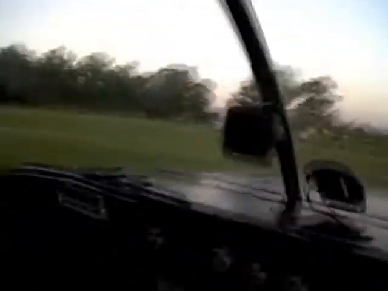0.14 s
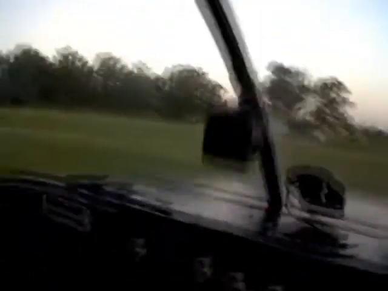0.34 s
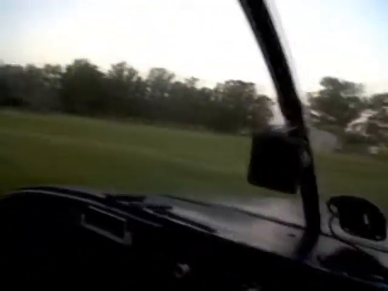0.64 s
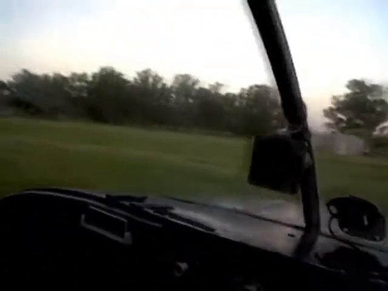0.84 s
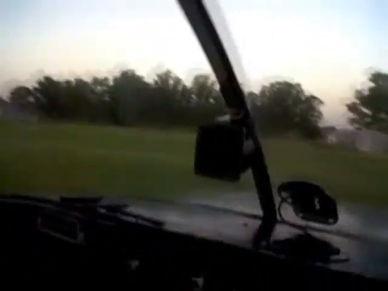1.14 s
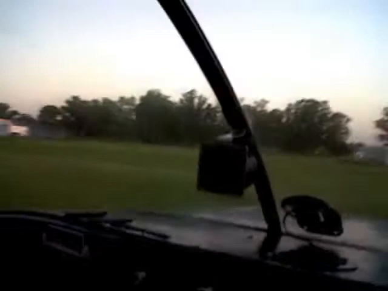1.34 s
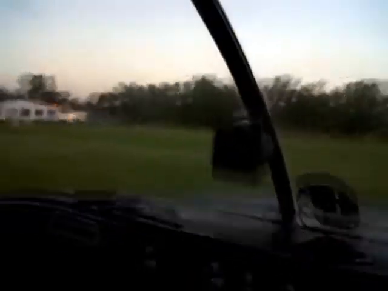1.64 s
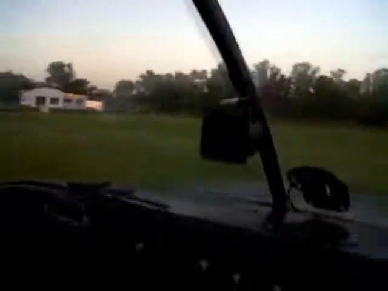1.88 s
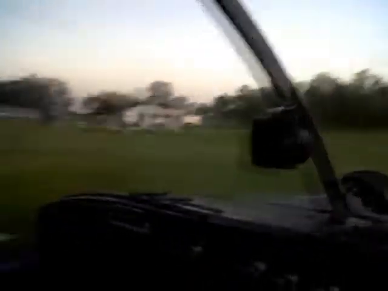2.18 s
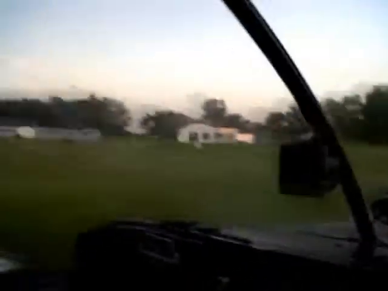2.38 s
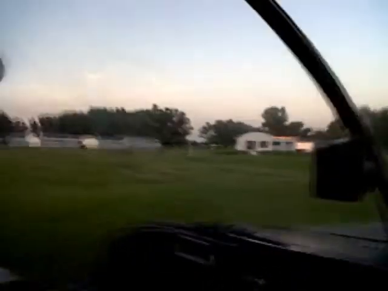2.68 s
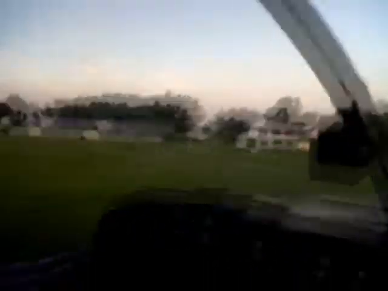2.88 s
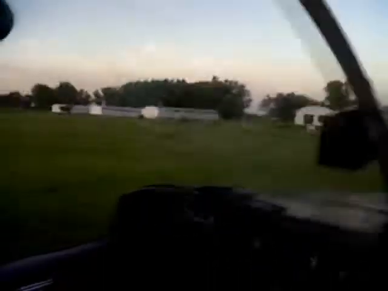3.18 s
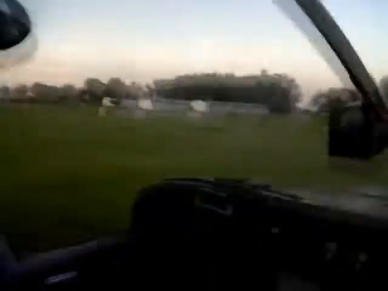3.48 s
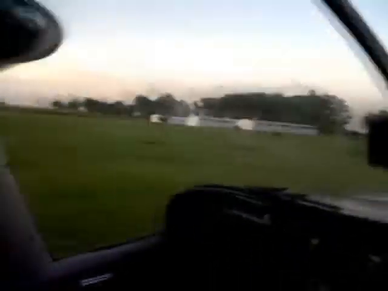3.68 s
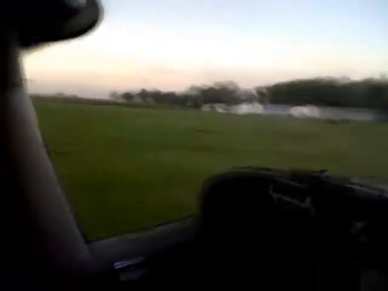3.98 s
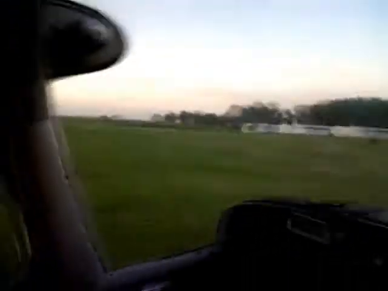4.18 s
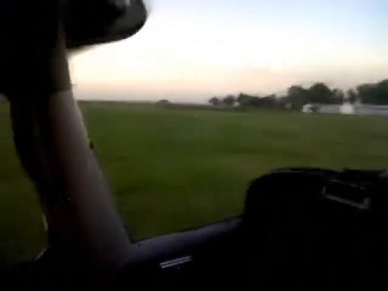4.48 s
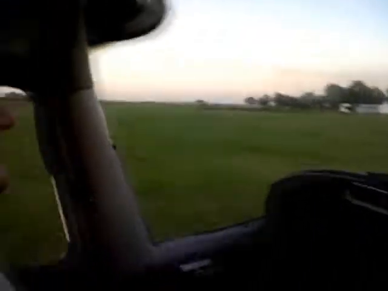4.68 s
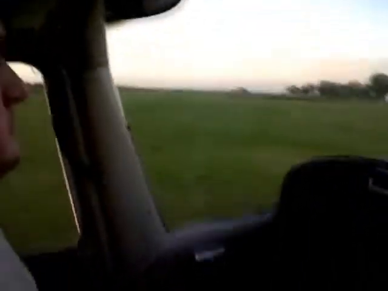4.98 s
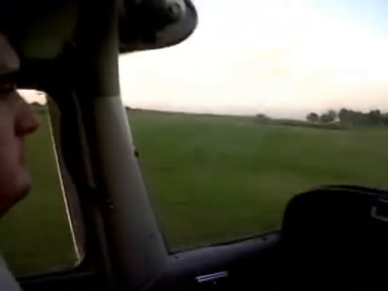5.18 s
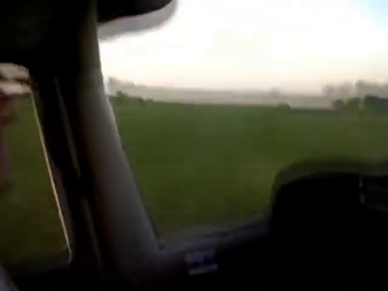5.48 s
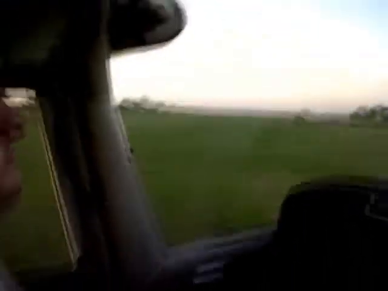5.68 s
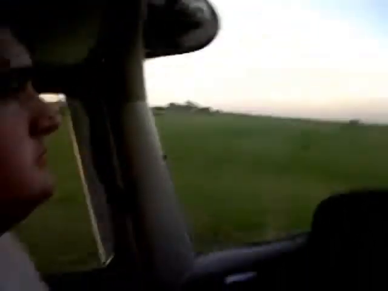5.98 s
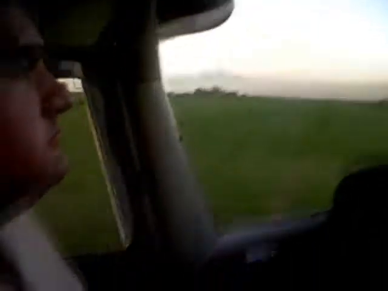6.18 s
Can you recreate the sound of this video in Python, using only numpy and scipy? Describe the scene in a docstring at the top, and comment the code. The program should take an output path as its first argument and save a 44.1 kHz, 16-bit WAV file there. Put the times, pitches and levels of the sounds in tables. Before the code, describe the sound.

Heard inside a small vehicle on uneven grass, through a narrow-band, boxy pocket microphone. A low engine drone pulses throughout, rising slightly in pitch during the first second, then easing by about 1.8 s and holding steady. Around it lie a rough body roar, buzzing panels and faint loose clatter. Light knocks and soft hollow floor clonks mark the first two seconds, with a small squeak and rattle near 1.6. At 2.2 a hard bump makes panels bang and everything swell, then sink. Another at 2.7 brings thumps, bright short squeaks to 2.85 and several hollow blows until 3.1. After a brief lull, a jolt at 3.65 leads into the roughest stretch, 3.9 to 4.9: crowded knocks, wheel thumps, clonks and rattling over louder roar. It calms around 5, jolts once more at 5.6 with a faint squeak at 5.9, then drones on to a small knock at 6.26 and abrupt end.

```python
"""An engine drones on its crank orders in a small vehicle rolling over rough grass, heard in the cabin through
a narrow-band pocket microphone. Noise bands make the body roar, random touches make panels buzz; contacts ring
panel modes as knocks, short tones make wheel thumps and floor clonks, noise puffs squeak. Loose parts clatter
and rattle as noise; at times the level of drone, buzz, roar and clatter rises together, holds, then sinks."""
import sys
import numpy as np
from scipy import signal
from scipy.fft import rfft, irfft
from scipy.io import wavfile
from scipy.ndimage import uniform_filter1d

SR = 44100
rng = np.random.default_rng(int(sys.argv[2]) if len(sys.argv) > 2 else 0)


def voltage_ratio(level):
    """Linear amplitude factor for a level in decibels (scalar or array-like)."""
    return 10 ** (np.asarray(level, float) / 20)


def persist_wave(psi):
    """Save psi, clipped to +-1, as 16-bit WAV."""
    counts = np.round(np.clip(psi, -1, 1) * 32767).astype(np.int16)
    wavfile.write(sys.argv[1], SR, np.atleast_2d(counts).T)


N = 279153

# crank speed: (time [s], speed [turns/s])
CRANK_SPEED = [(0.0, 25.5), (0.12, 26.8), (0.65, 28.0), (0.93, 28.1), (1.76, 25.7), (2.19, 25.8),
               (2.27, 25.1), (4.11, 24.8), (6.33, 25.0)]
# drone between bumps: (time [s], level [dB])
DRONE_LEVEL = [(0, -41.5), (.45, -36.5), (1.0, -39.5), (1.9, -40.5), (2.1, -39), (3.3, -39), (6.33, -36.5)]
# drone lines: (multiple of crank speed [1], relative level [dB])
CRANK_ORDERS = [(2, -13.5), (3.5, -16), (4, 2), (4.5, -10.5), (5, -14), (6, -2), (6.5, -10), (7, -8.5),
                (7.5, -11.5), (8, -3.5), (8.5, -9), (9, -7), (10, -12)]
# extra third crank order, raised 2 dB in use: (time [s], level re drone [dB])
THIRD_ORDER_LEVEL = [(0, -6.5), (.5, -0.5), (1.0, -4.5), (1.5, -5.5), (2.2, -23.5), (6.33, -15)]
# swells of the shared level: (time [s], rise [dB], hold from that time [s])
SWELLS = [(1.498, 1.5, 0.27), (1.626, 3.5, 0.035), (1.953, 3.5, .06), (2.216, 12, 0.09), (2.695, 9.5, 0.23),
          (3.217, 0.5, 0.2), (3.654, 9, 0.083), (3.797, 5, 0.19), (3.909, 10.5, 0.3), (4.305, 9, 0.14),
          (4.422, 11.5, 0.36), (5.081, 1, 0.28), (5.582, 10, 0.25)]
# brief level dips: (time of the lowest point [s], depth [dB])
DIPS = [(1.399, 4.5), (1.90, 4), (2.60, 2), (3.568, 5), (4.36, 1.5), (5.04, 2.5), (5.49, 3), (6.13, 2.5)]
# body roar spectrum: (frequency [Hz], relative density [dB per Hz])
ROAR_SPECTRUM = [(30, -16), (60, -9), (100, -3), (216, -5.5), (330, -5.5), (535, -6.5), (800, -3),
                 (1210, -3.5), (1580, -7.5), (2000, -23.5), (2600, -29.5), (4000, -45.5)]
# panel modes: (frequency [Hz], relative level in the buzz [dB], t60 [s])
PANEL_MODES = [(543, -4.5, 0.054), (686, -13, 0.34), (805, 0.5, 0.11), (877, -1, 0.12),
               (1058, -19.5, 0.063), (1188, -3.5, 0.082), (1240, -0.5, .06), (1356, 1, 0.045),
               (1460, -1, 0.068), (1572, -1, 0.04), (1770, -8.5, 0.065)]
# buzz modes above 1100 Hz: (time [s], added level [dB])
UPPER_MODES_LEVEL = [(0, 1.5), (.8, 3), (1.3, -2), (2.0, 0.5), (2.7, 2), (3.5, 0), (4.0, 2.5), (4.8, 2),
                     (5.2, 2.5), (5.8, 2), (6.33, -1.5)]
# steady clatter between bumps: (time [s], level [dB])
CLATTER_LEVEL = [(0, -65), (1, -65.5), (2, -63.5), (2.6, -64.5), (3.5, -65), (4.0, -63), (5, -62.5),
                 (5.7, -63), (6.33, -63)]
# panel knocks: (time [s], peak before dulling [dB], frequency of the most excited modes [Hz])
KNOCKS = [(0.117, -23.5, 1230), (0.249, -23.5, 1264), (0.435, -26.5, 1263), (1.498, -20, 1230),
          (1.546, -22.5, 805), (1.669, -19.5, 796), (1.749, -22, 1475), (1.826, -21.5, 1467),
          (1.843, -22, 805), (1.964, -23, 1470), (1.989, -20, 1240), (2.223, -7.5, 1194),
          (2.299, -11, 1280), (2.35, -11.5, 1197), (2.381, -15, 850), (2.455, -19, 830),
          (2.705, -8.5, 1227), (2.762, -16, 1240), (2.802, -20.5, 801), (2.857, -12.5, 1208),
          (3.407, -21.5, 1230), (3.5, -23, 802), (3.663, -16, 805), (3.715, -19.5, 1530),
          (3.896, -9.5, 1365), (3.97, -11.5, 1240), (4.025, -19.5, 940), (4.049, -11.5, 1230),
          (4.108, -15, 896), (4.155, -12.5, 1360), (4.217, -11.5, 1210), (4.265, -7.5, 1306),
          (4.286, -6.5, 1237), (4.426, -10, 1240), (4.479, -10, 1500), (4.618, -10.5, 1350),
          (4.639, -16.5, 1240), (4.696, -18, 812.7), (4.757, -9.5, 1380), (4.859, -18, 870),
          (4.945, -16, 1400), (5.092, -27, 1240), (5.59, -12, 1460), (5.662, -18.5, 807),
          (5.714, -17, 1372), (5.755, -15, 1380), (5.808, -21, 876), (5.928, -27.5, 800),
          (6.038, -28, 1190), (6.262, -23, 1460)]
# wheel thumps, 6.5 dB lower in use: (time [s], level [dB], frequency [Hz])
THUMPS = [(0.221, -28.5, 164), (1.118, -31.5, 204), (1.642, -24, 200), (2.661, -29, 209),
          (2.713, -16.5, 119), (3.895, -17.5, 183.3), (4.02, -16, 194), (4.185, -20.5, 204),
          (4.249, -19, 177.6), (4.412, -26, 174), (4.574, -22, 188), (5.655, -30, 183), (5.705, -30, 197),
          (6.019, -21, 200)]
# squeaks: (time [s], peak [dB], frequency [Hz])
SQUEAKS = [(0.2505, -37.5, 2490), (0.467, -42, 2550), (1.5866, -26.5, 2570), (2.24, -30, 2640),
           (2.7177, -27.5, 2570), (2.733, -33, 2480), (2.7823, -18.5, 2544), (2.8356, -16.5, 2560),
           (3.12, -43.5, 2570), (3.195, -42, 2535), (3.283, -47, 2530), (5.8672, -36.5, 2700)]
# hollow floor blows, 4 dB lower in use: (time [s], level [dB], frequency [Hz])
CLONKS = [(0.725, -28, 494), (0.876, -25, 505), (0.983, -27.5, 525), (1.082, -24, 514), (1.348, -22.5, 512),
          (1.425, -26.5, 542), (1.807, -29, 526), (1.842, -25.5, 530), (2.22, -20.5, 578),
          (2.506, -22.5, 626), (2.703, -22.5, 590), (2.745, -18.5, 430), (2.817, -18, 697),
          (2.862, -10.5, 531), (2.908, -13, 516), (2.945, -18, 600), (3.026, -15, 690), (3.069, -21, 520),
          (3.147, -22.5, 468), (3.666, -13, 550), (3.705, -17.5, 357), (3.743, -12, 547), (3.903, -9, 751),
          (3.949, -16.5, 566), (3.988, -12.5, 574), (4.11, -10.5, 554), (4.151, -21.5, 705),
          (4.192, -14, 520), (4.272, -10.5, 518), (4.435, -13, 548), (4.496, -17.5, 541),
          (4.695, -13.5, 686), (4.786, -19.5, 514), (4.856, -19.5, 550), (5.148, -22, 713),
          (5.658, -16.5, 475), (5.817, -21.5, 475), (6.259, -23, 480)]
# rattle bursts: (time [s], level re steady clatter [dB])
RATTLES = [(.78, 7), (1.091, 6.5), (1.33, 11.5), (1.584, 10.5), (1.841, 8.5), (2.23, 10.5), (2.354, 2.5),
           (2.719, 11), (2.79, 4.5), (2.851, 3), (3.195, 11.5), (3.939, 3), (4.07, 6.5), (4.12, 2.5),
           (4.432, 8), (4.48, 5), (4.635, 7), (4.769, 6.5), (5.3, 6), (5.59, 9), (5.864, 7), (6.218, 7.5)]
# mirror images of the low-rate sampling: (frequency [Hz], gain [dB])
MIRROR_GAIN = [(3900, 0), (4700, -13.5), (5450, -26.5), (6500, -45.5), (7200, -61.5), (7600, -93.5),
               (8600, -80), (9200, -65), (10000, -88.5)]

RISE_S, DRONE_RISE_S, SINK_DB_PER_S, DIP_S = 0.005, 0.015, 45, 0.037
DRONE_SHARE, CLATTER_SHARE = 0.98, 0.97   # of each swell and dip, in dB
BUZZ_DB = -36                             # between bumps
STIR_DB, STIR_S = -19, 0.014              # panel stir re knock peak; time to its maximum
RATTLE_S, KNOCK_S, SQUEAK_S = 0.018, 0.049, 0.013
SAMPLING_HZ = 8000


def rms_one(x):
    """Scales to rms 1."""
    return x / np.sqrt(np.mean(x ** 2) + 1e-20)


def in_time(rows):
    """Interpolates table columns to one value a sample."""
    s, *columns = np.transpose(rows)
    return [np.interp(np.arange(N) / SR, s, c) for c in columns]


def drift(rate_hz):
    """Slow noise of rms 1: two equal poles at rate_hz, run on every 40th sample."""
    r = np.exp(-80 * np.pi * rate_hz / SR)
    white = rng.standard_normal(N // 40 + 2002)
    slow = signal.lfilter([1], [1, -2 * r, r * r], white)[2000:]
    return np.interp(np.arange(N) / 40, np.arange(len(slow)), rms_one(slow))


def ring(clicks, hz, t60_s):
    """Two-pole resonance: a unit click starts a decaying sine of height 1."""
    r, w = voltage_ratio(-60 / (t60_s * SR)), 2 * np.pi * hz / SR
    return signal.lfilter([0, np.sin(w)], [1, -2 * r * np.cos(w), r * r], clicks + 1e-18)


def cut(x, hz, kind, order=2):
    """Butterworth filter."""
    return signal.sosfilt(signal.butter(order, hz, kind, fs=SR, output="sos"), x)


def dying(times_s, gains, tau_s):
    """Envelope that rises fast from each time, peaks at its gain after tau_s and dies away."""
    jumps, r = np.zeros(N), np.exp(-1 / (tau_s * SR))
    jumps[(np.array(times_s) * SR).astype(int)] = gains
    return signal.lfilter([np.e / (tau_s * SR)], [1, -2 * r, r * r], jumps + 1e-18)


def bursts(rows, cycles, rough, lose_db):
    """Short swelling and dying tones with an uneven envelope, their length set in cycles."""
    out = np.zeros(N)
    for s, level_db, hz in rows:
        length_s = cycles / hz
        t = np.arange(int(4 * length_s * SR)) / SR
        lumps = uniform_filter1d(rng.standard_normal(4000), 60)[:len(t)]
        shape = t / (0.36 * length_s) * np.exp(1 - t / (0.43 * length_s))
        shape = shape * (1 + rough * 8 * lumps)
        tone = voltage_ratio(level_db - lose_db) * shape * np.sin(2 * np.pi * hz * t)
        at = int(s * SR)
        out[at:at + len(t)] += tone[:N - at]
    return out


def swell(rise_s):
    """Level change in dB: the highest swell at each moment, less the dips."""
    t = np.arange(N) / SR
    rises = []
    for s, db, hold_s in SWELLS:
        sinking_db = np.maximum(db - SINK_DB_PER_S * np.maximum(t - s - hold_s, 0), 0)
        rises.append(np.clip((t - s) / rise_s, 0, 1) * sinking_db)
    dips_db = sum(db * np.exp(-((t - s) / DIP_S) ** 2) for s, db in DIPS)
    return np.max(rises, axis=0) - dips_db


def engine(turns_per_s):
    """Sines on the crank orders, wavering in strength and phase, over lumpy exhaust noise."""
    angle = 2 * np.pi * np.cumsum(turns_per_s) / SR

    def order(multiple):
        phase = rng.uniform(0, 2 * np.pi) + 0.15 * drift(0.78)
        return np.sin(multiple * angle + phase) * voltage_ratio(1.5 * drift(8.7))

    lines = rms_one(sum(voltage_ratio(db) * order(multiple) for multiple, db in CRANK_ORDERS))
    third = voltage_ratio(in_time(THIRD_ORDER_LEVEL)[0] + 2.0) * order(3)
    exhaust = rms_one(cut(rng.standard_normal(N), [90, 280], "band")) * voltage_ratio(3.5 * drift(38))
    drone_db = in_time(DRONE_LEVEL)[0] + DRONE_SHARE * swell(DRONE_RISE_S) + 2.2 * drift(4.8)
    return voltage_ratio(drone_db) * (voltage_ratio(-1.5) * lines + third + voltage_ratio(-9.5) * exhaust)


def roar(patchy_db):
    """Half-octave noise bands, throbbing together and flickering apart; rms 1 in 400-2000 Hz."""
    out, together, white = 0, drift(19), rng.standard_normal((2, N))
    hz_points, db_points = np.transpose(ROAR_SPECTRUM)
    edges_hz = 30 * 2 ** np.arange(0, 7.2, 0.5)
    for k, (low, high) in enumerate(zip(edges_hz, edges_hz[1:])):
        db = np.interp(np.log(low * high) / 2, np.log(hz_points), db_points)
        band_db = db + patchy_db * (together + 1.4 * drift(9.8))
        out = out + voltage_ratio(band_db) * cut(white[k % 2], [low, high], "band")   # neighbours differ
    return out / np.std(cut(out, [400, 2000], "band"))


def buzz(per_s, spread_db):
    """Loose panels touch at random, in clumps; each mode rings and wavers on its own; rms 1."""
    touches = (rng.random(N) < per_s / SR) * voltage_ratio(spread_db * np.minimum(rng.exponential(1, N), 4))
    touches = touches * voltage_ratio(2.4 * drift(12.0))
    upper_db = in_time(UPPER_MODES_LEVEL)[0]
    out = 0
    for hz, db, t60_s in PANEL_MODES:
        mode_db = db + upper_db * (hz > 1100) + 1.7 * drift(8.4)
        out = out + voltage_ratio(mode_db) * ring(touches * rng.standard_normal(N), hz, t60_s)
    return rms_one(out)


def panel_shake(cycles, swell_db):
    """Gain of buzz and roar: each firing shakes the panels, each knock leaves them stirred."""
    throb_db = 0.66 * np.cos(np.pi * cycles) + 0.73 * np.cos(2 * np.pi * cycles)
    s, knock_db, _ = np.transpose(KNOCKS)
    stir = dying(s, voltage_ratio(knock_db + STIR_DB), STIR_S)
    return np.hypot(voltage_ratio(BUZZ_DB + swell_db + throb_db), stir)


def clatter():
    """Small loose parts: grainy, flickering noise, 1900-3400 Hz, plus a resonance; rms 1."""
    grains = rng.standard_normal(N) * voltage_ratio(2.1 * drift(45))
    wide = rms_one(cut(grains, [1900, 3400], "band"))
    resonance = rms_one(ring(grains, 3140, 0.01))
    return rms_one(wide + voltage_ratio(-10.5 + 5.2 * drift(4.4)) * resonance)


def rattle_gain(swell_db):
    """Gain of the clatter: steady level with the swells, raised by short rattle bursts."""
    s, rattle_db = np.transpose(RATTLES)
    steady = voltage_ratio(in_time(CLATTER_LEVEL)[0] + CLATTER_SHARE * swell_db)
    return steady * np.hypot(1, dying(s, voltage_ratio(rattle_db), RATTLE_S))


def turn_clonks(cycles, swell_db):
    """Rows for faint floor blows, one a crank turn, of chance strength and pitch."""
    at = np.flatnonzero(np.diff(np.floor(cycles)))
    chance = rng.standard_normal((len(at), 2))
    level_db = -34 + swell_db[at] + 4 * chance[:, 0]
    return np.transpose([at / SR, level_db, 550 * np.exp(0.096 * chance[:, 1])])


def floor_clonks(cycles, swell_db):
    """Hollow floor blows: the loud ones and those of each crank turn, as short rough tones."""
    rows = [*CLONKS, *turn_clonks(cycles, swell_db)]
    return bursts(rows, cycles=2.63, rough=0.3, lose_db=4.0)


def knocks():
    """A short noisy contact rings the panel modes, most those near its pitch; soon damped."""
    out, noise = np.zeros(N), cut(rng.standard_normal(N), 1900, "low", order=4)
    t = np.arange(int(0.08 * SR)) / SR
    for s, peak_db, pitch_hz in KNOCKS:
        at = int(s * SR)
        contact = noise[at:at + len(t)] * (t * np.exp(-t / 0.003))[:N - at]
        rung = 0
        for hz, _, t60_s in PANEL_MODES:
            away_db = min(60 * abs(np.log2(hz / pitch_hz)), 25)
            rung = rung + voltage_ratio(-away_db) * ring(contact, hz, t60_s)
        rung = rung * np.exp(-(t / KNOCK_S) ** 2)[:N - at]
        out[at:at + len(t)] += voltage_ratio(peak_db) * rung / np.abs(rung).max()
    return out


def thumps():
    """Wheel thumps: low tones of a few cycles."""
    return bursts(THUMPS, cycles=2.5, rough=0.1, lose_db=6.5)


def squeaks():
    """Rubbing fittings: a noise puff through a resonance and a shorter-lived one 8 % above it."""
    out, noise = np.zeros(N), rng.standard_normal(N)
    t = np.arange(int(0.05 * SR)) / SR
    for s, peak_db, hz in SQUEAKS:
        at = int(s * SR)
        puff = noise[at:at + len(t)] * np.sqrt(t / SQUEAK_S) * np.exp(-(t / SQUEAK_S) ** 2)
        rung = ring(puff, hz, 0.018) + voltage_ratio(1) * ring(puff, 1.08 * hz, 0.011)
        rung = cut(rung, [0.85 * hz, 1.08 * hz], "band")
        out[at:at + len(t)] += voltage_ratio(peak_db) * rung / np.abs(rung).max()
    return out


def scene():
    """Sums all sources in the cabin."""
    turns_per_s, swell_db = in_time(CRANK_SPEED)[0], swell(RISE_S)
    cycles = np.cumsum(turns_per_s) / SR
    shaken = voltage_ratio(-3.0) * roar(patchy_db=1.36) + buzz(1500, spread_db=2.0)
    panels = panel_shake(cycles, swell_db) * shaken + knocks()
    blows = thumps() + floor_clonks(cycles, swell_db)
    dull = cut(panels + blows, 2550, "low", order=3)   # upholstery swallows the treble
    rattling = rattle_gain(swell_db) * clatter()
    return (engine(turns_per_s) + dull + rattling + squeaks())[None]


def roll_off(x):
    """The treble ends steeply here."""
    return signal.sosfilt(signal.butter(12, 9900, fs=SR, output="sos"), x)


def record(dry):
    """Low-rate sampling: the band ends below half the rate, faint mirror images lie above; hiss."""
    band = cut(cut(dry, 70, "high"), 3530, "low", order=6)
    band = band * np.minimum(np.arange(N)[::-1] / 200, 1)   # short fade at the end
    looped = np.hstack([band, band[:, ::-1]])               # there and back, so that the ends join
    carrier = 2 * np.cos(2 * np.pi * SAMPLING_HZ * np.arange(2 * N) / SR)
    mirrored = rfft(looped * carrier)
    hz = np.linspace(0, SR / 2, mirrored.shape[1])
    gain = voltage_ratio(np.interp(hz, *np.transpose(MIRROR_GAIN))) * (hz > SAMPLING_HZ / 2)
    images = irfft(mirrored * gain)[:, :N]
    hiss = voltage_ratio(-103) * rng.standard_normal(dry.shape)
    return roll_off(band + images + hiss)


dry = scene()
out = record(dry)
persist_wave(out)
```